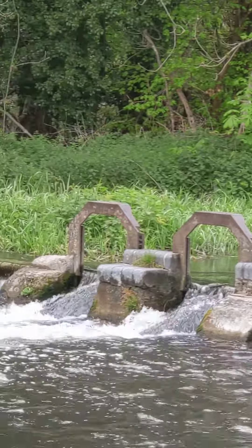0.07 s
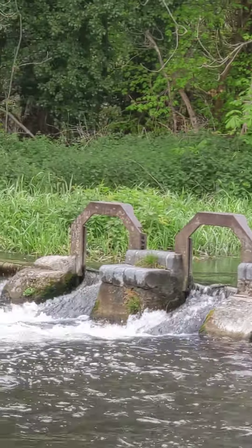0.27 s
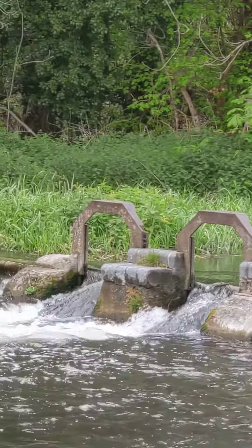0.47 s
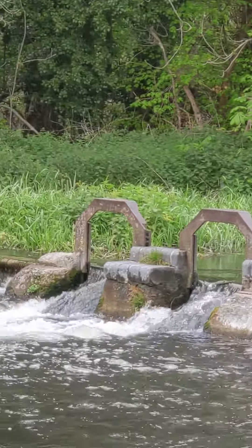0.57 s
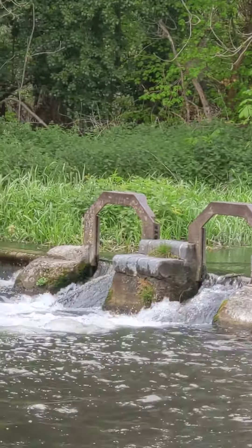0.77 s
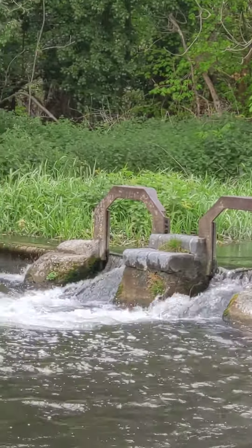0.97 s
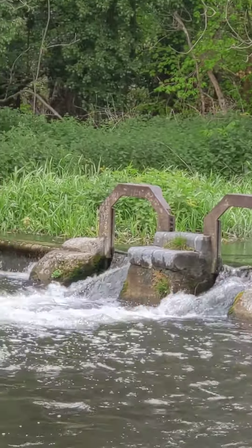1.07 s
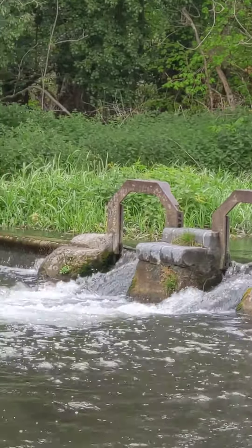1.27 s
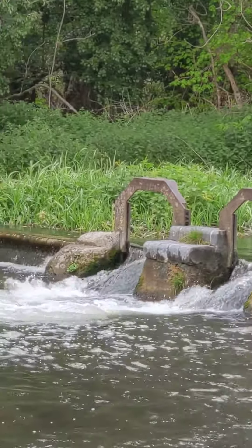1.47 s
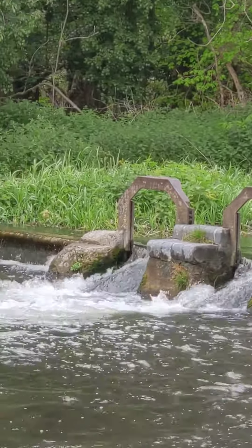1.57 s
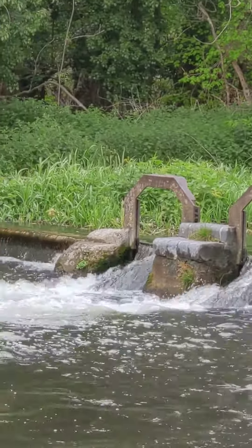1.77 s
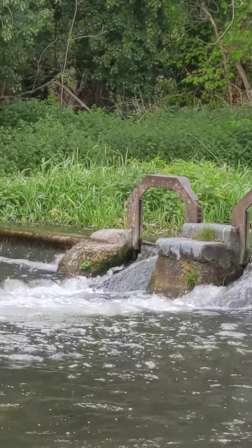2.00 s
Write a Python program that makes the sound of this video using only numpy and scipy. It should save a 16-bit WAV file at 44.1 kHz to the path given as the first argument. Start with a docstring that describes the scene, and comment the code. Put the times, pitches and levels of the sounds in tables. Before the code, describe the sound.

Wind buffets the microphone with an uneven low rumble and a few sharp pops. Behind it, river water rushes steadily over a small stone weir some metres away, and small birds chirp faintly from the far bank.

```python
"""By a river, some metres from a small stone weir, on a gusty day.
Small birds call faintly from the trees on the far bank. The water pours over the weir in a steady rush
of foam (noise) and countless small bubbles (tiny ringing tones). Loudest is the wind, which buffets the
two microphone openings with an uneven low churning and a few sharp pops."""
import sys
import numpy as np
from scipy import signal
from scipy.fft import rfft, irfft
from scipy.io import wavfile
from scipy.ndimage import uniform_filter1d, minimum_filter1d

SR = 44100
rng = np.random.default_rng(int(sys.argv[2]) if len(sys.argv) > 2 else 0)


def materialize(psi):
    """Save the field psi as 16-bit PCM at rate SR to the path in sys.argv[1].

    A 1-D psi becomes a single channel; in a 2-D psi each row is a channel.
    """
    bounded = np.clip(np.atleast_2d(psi).T, -1, 1)
    quanta = np.round(bounded * 32767).astype(np.int16)
    wavfile.write(sys.argv[1], SR, quanta)


N = 89831


def undb(db):
    """Turn decibels into a factor to multiply by."""
    return 10 ** (np.asarray(db) / 20)


def unit(x):
    """Scale a sound to an average strength (rms) of 1."""
    return x / np.sqrt(np.mean(x ** 2) + 1e-18)


def curve(table, column):
    """Read one column of a time table at every sample."""
    rows = np.array(table, float)
    return np.interp(np.arange(N) / SR, rows[:, 0], rows[:, column])


def bins():
    """The frequencies of the spectrum, in Hz."""
    return np.maximum(np.arange(N // 2 + 1) * SR / N, 1)


def across(table, column=1):
    """Read one column of a frequency table at every frequency."""
    rows = np.array(table, float)
    return np.interp(np.log(bins()), np.log(rows[:, 0]), rows[:, column])


def colour(x, table):
    """Shape a sound's lows and highs by a table, then scale it to strength 1."""
    return unit(irfft(rfft(x) * undb(across(table)), N))


def pan(db):
    """Left and right gains that make the left louder by db."""
    return undb(np.array([[1], [-1]]) * db / 2)


def smooth(x, samples):
    """Round off quick changes with two moving averages."""
    return uniform_filter1d(uniform_filter1d(x, samples), samples)


def wobble(per_s):
    """A smooth random wobble that heads for a new value per_s times a second."""
    hold = int(SR / per_s)
    steps = rng.standard_normal(N)[np.arange(N) // hold]
    return unit(smooth(steps, hold))


def rough_tone(hz, roughness):
    """A tone whose pitch trembles by the fraction roughness."""
    return np.sin(2 * np.pi * np.cumsum(hz * (1 + roughness * wobble(300))) / SR)


def birds():
    """A few chirps that rise and fall and one thin falling whistle, with an echo from the trees."""
    # chirps: t/s, top f/Hz, level/dB, half length/s, pitch drop at both ends/Hz, roughness
    chirps = [(0.27, 3640, -56, .04, 100, .025), (.405, 4057, -53, .055, 150, 0.033),
              (1.204, 5280, -56.5, .036, 900, .022), (1.515, 5200, -59, .036, 900, .018)]
    t, song = np.arange(N) / SR, np.zeros(N)
    for at, top_hz, db, half_s, drop_hz, roughness in chirps:
        place = np.clip((t - at) / half_s, -1, 1)  # -1 at the start, 1 at the end
        song += undb(db) * np.cos(np.pi * place / 2) * rough_tone(top_hz - drop_hz * place ** 2, roughness)
    whistle_at, whistle_s, from_hz, to_hz, glide_s = 1.772, 0.195, 8950, 8090, 0.068
    age = np.clip(t - whistle_at, 0, whistle_s)
    hz = to_hz + (from_hz - to_hz) * np.exp(-age / glide_s)
    fade = np.abs(np.sin(np.pi * age / whistle_s)) ** 0.3
    song += undb(-60.5 + 1.5 * wobble(90)) * fade * rough_tone(hz, roughness=0.0028)
    trees = rng.standard_normal((2, N)) * np.exp(-np.log(1000) * t / 0.36)  # 60 dB down in 0.36 s
    trees /= np.sqrt(np.sum(trees ** 2) / 2)
    echo = signal.fftconvolve(song[None], trees, axes=1)[:, :N]
    return (song + undb(-3.5) * echo) * pan(7)


def bubbles():
    """A crowd of small bubbles, each a short ring that rises in pitch."""
    per_s, cycles, rise, spread_db = 4000, 9.5, 0.17, 3
    out = np.zeros(N)
    for when, pitch, strength in rng.random((int(per_s * N / SR), 3)):
        hz = 400 * 30 ** pitch  # 400 to 12000 Hz
        start = int(when * N)
        samples = min(int(3 * cycles * SR / hz), N - start)
        age = np.arange(samples) * hz / SR / cycles  # runs from 0 to 3
        ring = np.sin(2 * np.pi * cycles * age * (1 + rise * age / 2)) * np.exp(-2 * age)
        boost_db = spread_db * min(-np.log(1 - strength), 4)  # a few stand out
        out[start:start + samples] += ring * hz * undb(boost_db)
    return unit(out)


def white_water():
    """Foam noise and bubbles, flickering by about 1 dB as the fall churns."""
    bubble_share = 0.22
    foam = np.sqrt(1 - bubble_share) * rng.standard_normal(N)
    return (foam + np.sqrt(bubble_share) * bubbles()) * undb(wobble(24.48))


def weir():
    """The rush reaches left and right out of step; river and banks scatter it differently to each."""
    # tone of the rushing water: f/Hz, level/dB
    spectrum = [(120, -1), (400, -12.5), (600, -0.5), (1000, -2), (1300, -7.5), (1750, -14), (2150, -12),
                (2400, -18), (2800, -14), (3300, -24), (4000, -21), (4700, -26), (5300, -27), (6300, -31.5),
                (8000, -35.5), (10000, -39), (11000, -41.5), (15500, -42.5)]
    # how it arrives: f/Hz, left-right likeness (0 to 1), left over right/dB, lead of the left/radians
    stereo = [(201, 0.3, 7, -2.5), (710, 0.79, -0.5, -.5), (925, 0.93, -0.5, -0.8), (1296, 0.61, 0.5, -0.5),
              (2090, 0.71, -1, 1.5), (3220, 0.44, 0, 2.5), (4220, 0.35, 1.5, 5), (6300, 0.6, 1, 9),
              (7740, 0.2, 6.5, 7), (9500, 0.2, 8, 5), (13900, 0, 8.5, 2.5)]
    # rise and fall of the rush: t/s, body level/dB, hiss level/dB
    flow = [(0, 3, 6), (.4, 0.5, 5.5), (.6, 3.5, 5), (.7, -4, 6), (.88, -5, 1.5), (1.12, -1.3, 3),
            (1.33, -6.5, 0.5), (1.5, -2.5, 1.5), (1.8, 0, 0.2), (1.97, 2, 3.5)]
    weir_db, hiss_hz = -40, 2520
    likeness = across(stereo, 1)
    lead = np.exp(1j * across(stereo, 3) * np.array([[1], [0]]))
    direct = np.sqrt(likeness) * rfft(white_water()) * lead
    scatter = np.sqrt(1 - likeness) * rfft(np.array([white_water(), white_water()]))
    rush = colour(irfft((direct + scatter) * pan(across(stereo, 2)), N), spectrum)
    body = irfft(rfft(rush) / (1 + (bins() / hiss_hz) ** 4), N)
    hiss = rush - body
    return undb(weir_db) * (body * undb(curve(flow, 1)) + hiss * undb(curve(flow, 2)))


def buffet(spectrum, likeness, pan_db, even_s):
    """Swirling air of even strength; at negative likeness it pushes one opening and pulls the other."""
    likeness = np.clip(likeness, -0.95, 0.95)
    noise = colour(rng.standard_normal((2, N)), spectrum)
    same, opposite = noise / np.sqrt(smooth(noise ** 2, int(even_s * SR)))
    pressure = np.sqrt(1 + likeness) * same + np.sqrt(1 - likeness) * opposite * np.array([[1], [-1]])
    return pressure * pan(pan_db) / np.sqrt(2)


def surges():
    """Strength of the wind's deep rumble: brief swells over a light breeze."""
    # swells of wind: t/s, level/dB, half length/s
    swells = [(0.027, -12, 0.015), (0.081, -10.5, 0.018), (0.144, -10, 0.031), (0.239, -10.5, 0.048),
              (0.361, -11.5, 0.02), (.487, -11, 0.013), (0.558, -14.5, 0.015), (0.64, -13.5, 0.015),
              (0.753, -11.5, 0.03), (0.837, -11, .024), (.95, -14, 0.019), (1.004, -12, 0.024),
              (1.118, -10, 0.023), (1.177, -11.5, .014), (1.24, -10.5, 0.026), (1.316, -12.5, .014),
              (1.374, -16.5, .014), (1.454, -13.5, 0.022), (1.517, -13, 0.018), (1.606, -14.5, 0.027),
              (1.691, -13, 0.046), (1.821, -12, 0.023), (1.935, -11.5, 0.043), (2.024, -15, 0.02)]
    t, breeze_db = np.arange(N) / SR, -25
    power = sum(undb(db) ** 2 * np.exp(-((t - at) / half_s) ** 2) for at, db, half_s in swells)
    return np.sqrt(undb(breeze_db) ** 2 + power)


def wind():
    """A deep rumble and a flutter chopped up by small swirls; harder gusts make the flutter brighter."""
    # gusts at the microphone: t/s, flutter level/dB, left-right likeness (negative = opposite)
    gusts = [(0.0, -9, -0.6), (.08, -12.5, -0.84), (.16, -12, -0.75), (.24, -16.5, -0.68),
             (.29, -27.5, -.6), (.368, -12.5, -.68), (.41, -23.5, -0.4), (.49, -14.5, -0.71),
             (.535, -26.5, -0.83), (.56, -20, -0.77), (.6, -38, -0.95), (.62, -24.5, -.7), (.638, -7, -.45),
             (.685, -23.5, -0.14), (.73, -15, 0.03), (.78, -16, -0.32), (.83, -10.5, -0.5),
             (.89, -25.5, -0.49), (.925, -15.5, -0.76), (1.0, -13, -0.52), (1.065, -25, -0.4),
             (1.11, -17, -0.83), (1.135, -23, -0.83), (1.22, -11.5, -0.77), (1.26, -25, -.83),
             (1.308, -13.5, -0.56), (1.33, -25, -0.84), (1.365, -20.5, -0.69), (1.415, -28.5, -0.99),
             (1.45, -17, -0.72), (1.53, -24, -.75), (1.58, -12.5, -0.76), (1.645, -27.5, -0.91),
             (1.69, -16.5, -0.84), (1.76, -27, -0.77), (1.795, -17, -1.1), (1.84, -22, -0.79),
             (1.89, -18, -0.84), (1.93, -21, -0.88), (2.03, -17.5, -0.94)]
    # tone of the rumble, the flutter and the flutter's bright edge: f/Hz, level/dB
    rumble_tone = [(12, -59), (28, -27), (42, -2.5), (62, 7), (100, 5), (135, -0.5), (190, -14), (320, -52),
                   (1000, -120)]
    flutter_tone = [(20, -60), (70, -27), (125, -3), (170, 2.5), (240, -3.5), (320, -9.5), (410, -22),
                    (520, -38.5), (700, -54), (1500, -73), (5000, -120)]
    edge_tone = [(100, -43), (250, -1), (380, -0.5), (470, -7.5), (600, -22.5), (900, -30.5), (2000, -62),
                 (5000, -120)]
    swirl_db, swirls_per_s = 1.7, 60
    edge_growth = 1.71  # dB of edge for each dB of flutter
    likeness = curve(gusts, 2)
    force_db = curve(gusts, 1) + swirl_db * wobble(swirls_per_s)
    rumble = buffet(rumble_tone, likeness - 0.079, pan_db=-2, even_s=0.018) * surges() * undb(-0.52)
    flutter = buffet(flutter_tone, likeness + 0.18, pan_db=-3.5, even_s=0.021) * undb(force_db - 0.5)
    edge = buffet(edge_tone, likeness=0, pan_db=-5, even_s=0.03) * undb(edge_growth * force_db - 9.5)
    return rumble + flutter + edge


def pops():
    """The hardest swirls slap both openings: a pressure spike inside a few milliseconds of noise."""
    # slaps of air: t/s, left level/dB, right level/dB, upper edge f/Hz, half length/s
    slaps = [(0.024, -17, -12.5, 350, 0.0054), (0.129, -18, -17.5, 600, 0.0052),
             (0.363, -20.5, -10.5, 340, 0.0054), (0.487, -25, -15.5, 660, 0.0037),
             (.508, -28, -19.5, 544, 0.0014), (0.6556, -14, -9, 1440, 0.0026),
             (0.687, -15.5, -12.5, 119, 0.0074), (.7155, -23.5, -24, 1400, .0014),
             (.7235, -19.5, -20, 1100, 0.0023), (.7305, -12, -12.5, 360, 0.0052),
             (0.75, -20.5, -16.5, 1140, 0.003), (0.8143, -22.5, -16, 1190, 0.004),
             (.826, -17, -8, 510, 0.0025), (0.837, -21.5, -9, 480, 0.0034), (.87, -26, -21, 450, 0.0061),
             (0.909, -20, -8, 720, 0.0018), (0.943, -19, -8, 413, 0.0037),
             (0.959, -21.5, -11.5, 423, 0.0017), (1.117, -18, -10.5, 310, 0.007),
             (1.155, -20.5, -6.5, 260, 0.0059), (1.295, -24.5, -16.5, 524, .004),
             (1.309, -18.5, -9, 256, 0.0088), (1.581, -21.5, -15, 350, .005),
             (1.686, -20, -15.5, 302, 0.0038), (1.786, -24, -17.5, 310, 0.006)]
    body_hz, body_slope, edge_slope = 226, 1.75, 4.55
    t, hz, out = np.arange(N) / SR, bins(), np.zeros((2, N))
    body = 1 / np.hypot(body_hz / hz, hz / body_hz) ** body_slope
    for at, left_db, right_db, edge_hz, half_s in slaps:
        band = body / (1 + (hz / edge_hz) ** edge_slope)
        shape = np.exp(-((t - at) / half_s) ** 2)
        energy = np.sum(shape ** 2)
        spike = np.exp(-2j * np.pi * hz * at)  # the spectrum of a single click
        swirl = rfft(rng.standard_normal(N) * shape) / np.sqrt(energy)
        puff = irfft((spike + undb(0.5) * swirl) * band, N)
        out += puff * np.sqrt(energy / np.sum(puff ** 2)) * undb([[left_db], [right_db]])
    return out


def scene():
    """Weir and birds behind the wind on the microphone."""
    return weir() + birds() + wind() + pops()


def record(dry):
    """Cut the lowest bass, turn down any peak above full scale, then cut the highest treble."""
    low_cut_hz, top_hz, limiter_s = 26.6, 15500, 0.031
    dry = irfft(rfft(dry) / np.sqrt(1 + (low_cut_hz / bins()) ** 8), N)
    window = int(limiter_s * SR)
    gain = np.minimum(1, 1 / (np.abs(dry).max(axis=0) + 1e-9))
    gain = smooth(minimum_filter1d(gain, 2 * window), window)
    treble_cut = signal.ellip(10, 0.2, 80, top_hz, fs=SR, output="sos")
    return signal.sosfilt(treble_cut, dry * gain)


dry = scene()
out = record(dry)
materialize(out)
```